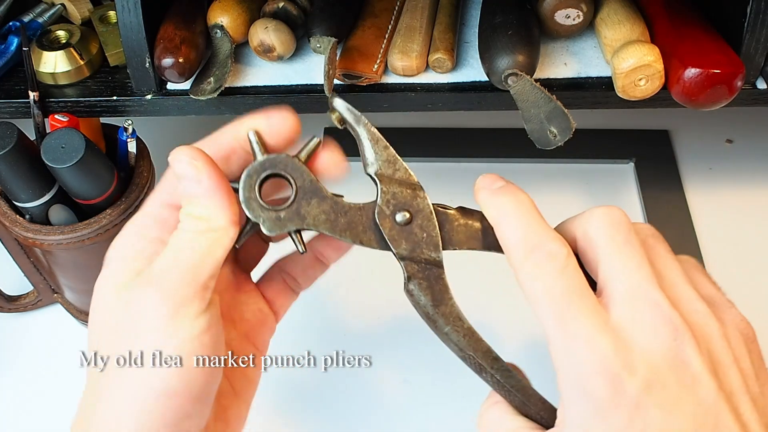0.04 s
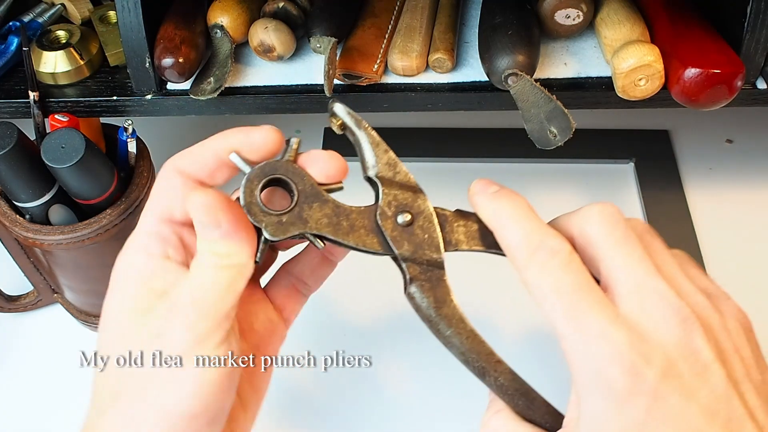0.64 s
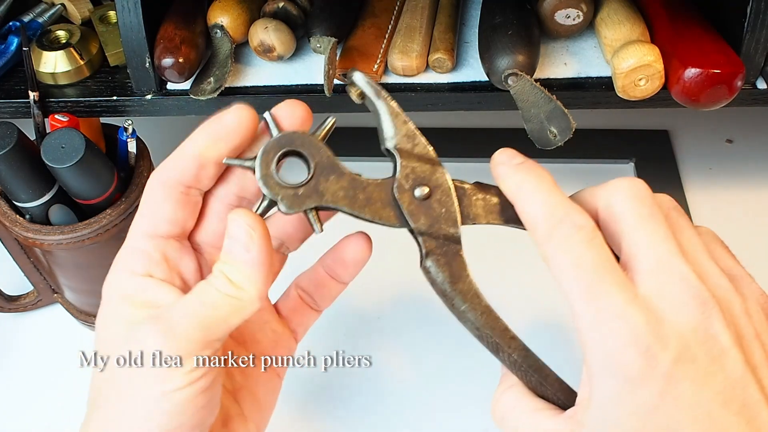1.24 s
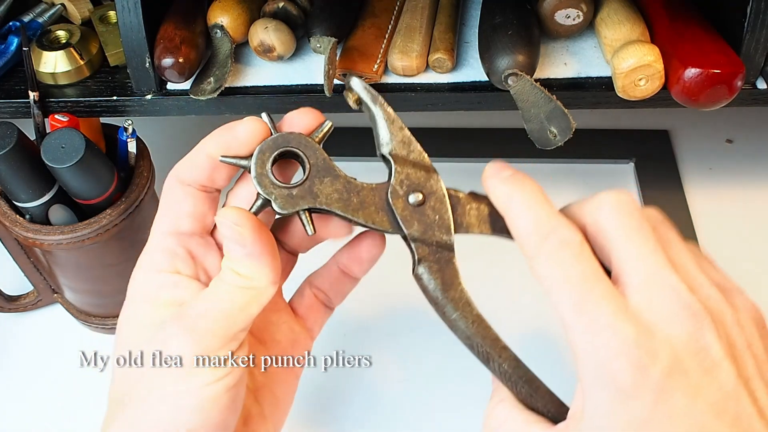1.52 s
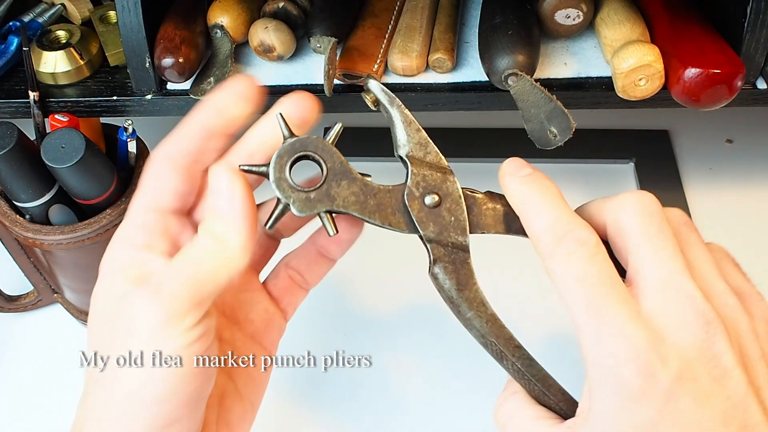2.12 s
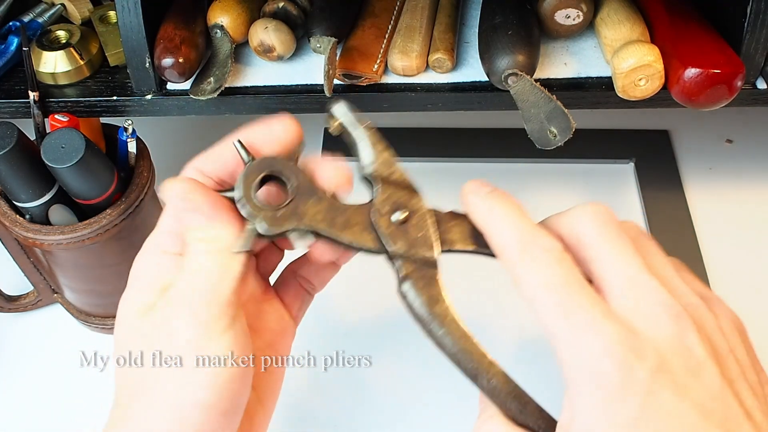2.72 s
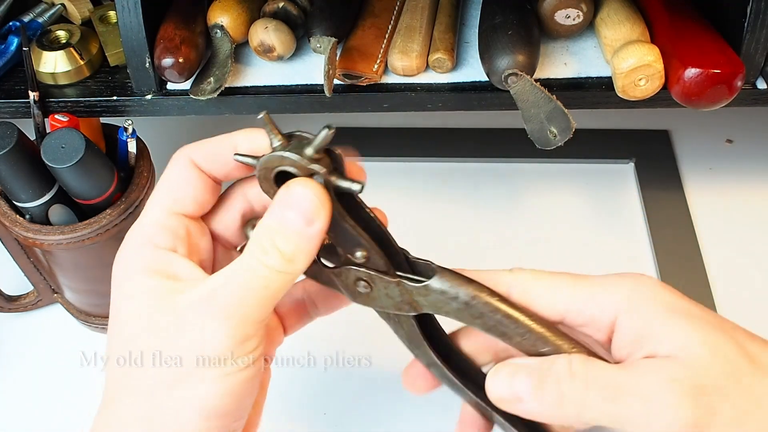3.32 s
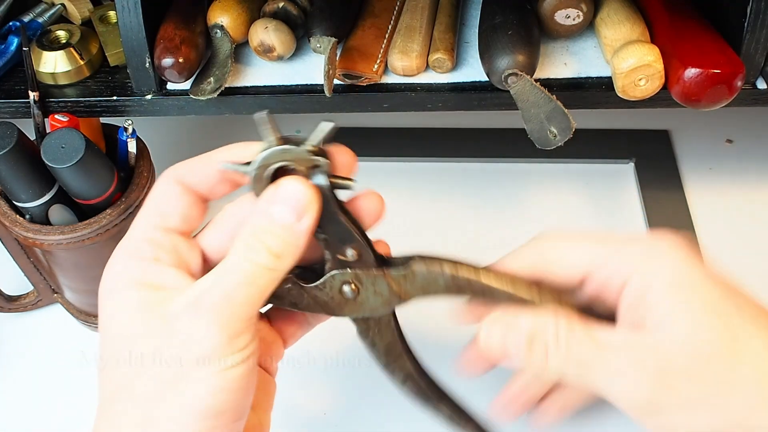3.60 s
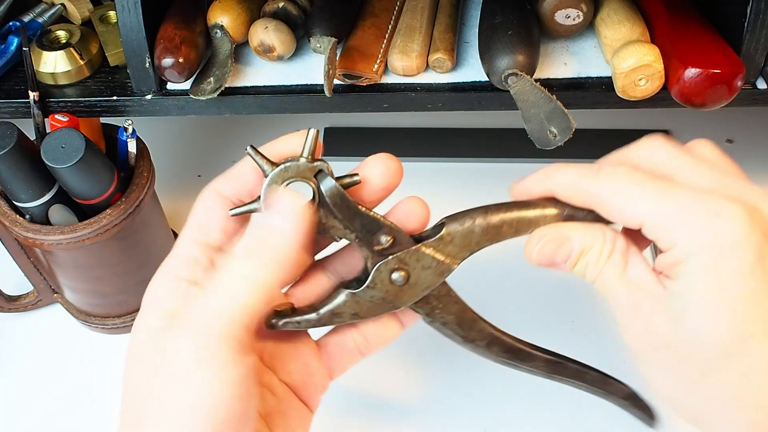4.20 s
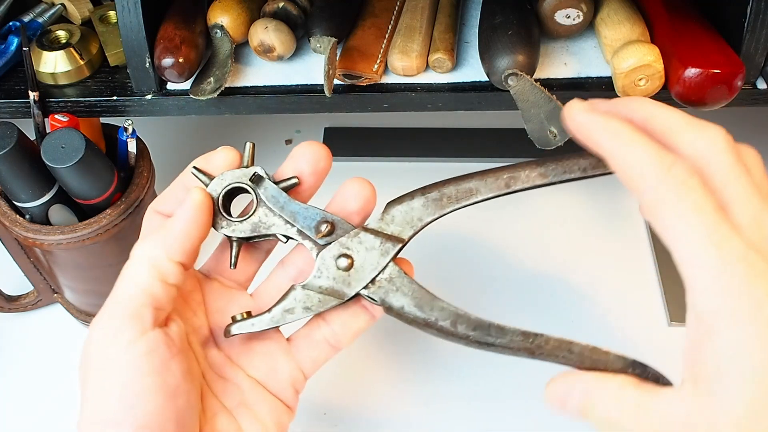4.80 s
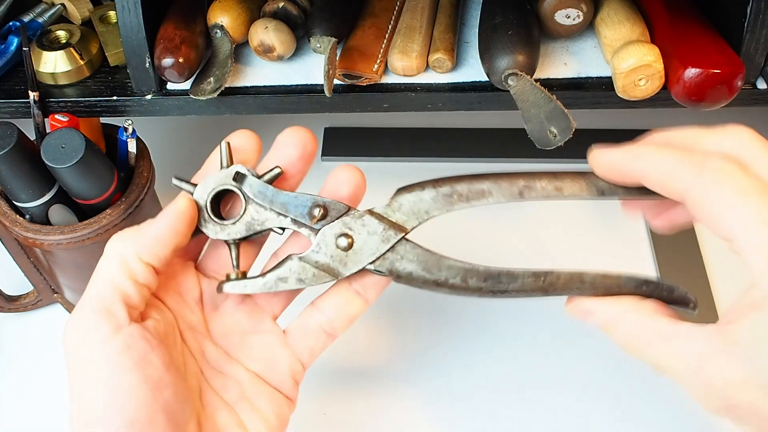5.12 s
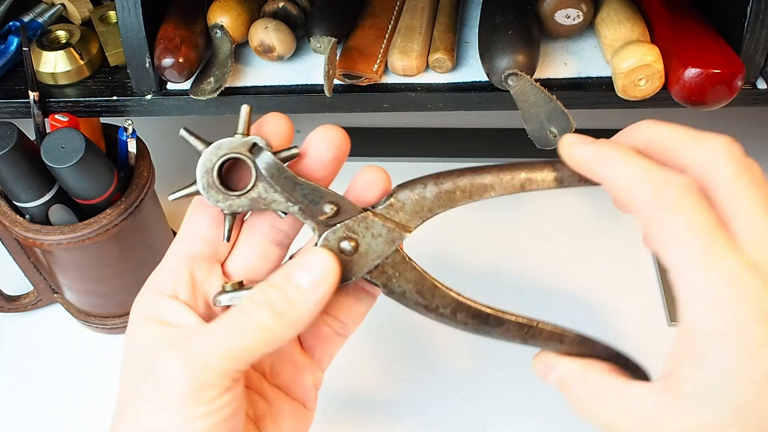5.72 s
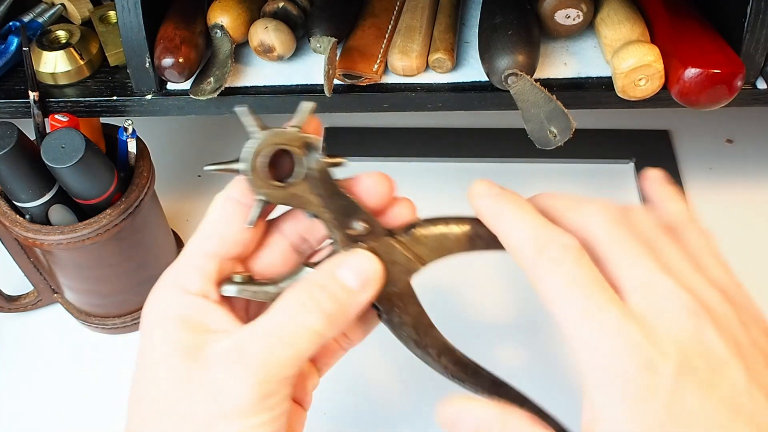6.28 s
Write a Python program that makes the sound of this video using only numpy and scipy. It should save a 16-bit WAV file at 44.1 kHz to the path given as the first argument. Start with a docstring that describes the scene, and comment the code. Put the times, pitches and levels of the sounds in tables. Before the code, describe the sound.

Steel punch pliers scrape and click sharply three times, then rub faintly and clack shut over a soft fan hum.

```python
"""A soft fan hums, then old steel punch pliers scrape and snap close by in a small workroom.
Three times the turret drags off its leaf spring and snaps into the next notch. Fingers shift their grip,
the pivot rubs as the handles open, the bench is bumped, and a punch clacks onto the anvil.
Clicks are short steel modes plus a noise crack; rubs are uneven noise through one resonance.
The loudest clicks clip."""
import sys
import numpy as np
from scipy import signal
from scipy.fft import rfft, irfft, next_fast_len
from scipy.io import wavfile
from scipy.ndimage import uniform_filter1d

SR = 44100
rng = np.random.default_rng(int(sys.argv[2]) if len(sys.argv) > 2 else 0)


def unload_wav(signal):
    """Save mono or channel-first audio to the path in sys.argv[1] as 16-bit WAV at rate SR, clipped to [-1, 1]."""
    wavfile.write(
        sys.argv[1],
        SR,
        np.round(np.clip(np.atleast_2d(signal).T, -1, 1) * 32767).astype(np.int16),
    )


N = 280021
TIME = np.arange(N) / SR


def amp(db):
    """Decibels to gain."""
    return 10 ** (np.asarray(db) / 20)


def unit(x):
    """Scale to rms 1."""
    return x / np.sqrt(np.mean(x ** 2))


def read(points, hz):
    """Interpolate (Hz, value) points on a log-frequency axis."""
    f, value = np.transpose(points)
    return np.interp(np.log(hz + 1), np.log(f), value)


def shape(x, gain):
    """Filter by a gain that is a function of frequency."""
    size = next_fast_len(x.shape[-1])
    return irfft(rfft(x, size) * gain(np.fft.rfftfreq(size, 1 / SR)), size)[..., :x.shape[-1]]


def colour(x, points):
    """Filter by a (Hz, dB) curve, then scale to rms 1."""
    return unit(shape(x, lambda hz: amp(read(points, hz))))


def noise_pair(size, likeness):
    """Stereo noise; likeness is the share of power common to both sides."""
    shared = np.sqrt(likeness) * rng.standard_normal(size)
    return shared + np.sqrt(1 - likeness) * rng.standard_normal((2, size))


def fade(t, t60):
    """Free decay, 60 dB in t60 seconds."""
    return np.exp(-np.log(1000) * t / t60)


def add(track, start_s, sound):
    """Mix a sound into a stereo track."""
    start = max(int(start_s * SR), 0)
    part = sound[..., :N - start]
    track[:, start:start + part.shape[-1]] += part


# Each row: frequency in Hz, relative noise density in dB.
AIR_COLOUR = [(25, -12), (85, .3), (230, -3), (350, -9), (540, -6), (700, -9.5), (1030, -8), (1350, -12.5),
              (2400, -16.5), (2850, -15), (5300, -17.5), (8300, -22), (12000, -26), (15500, -27)]
# Each row: frequency in Hz, share of power common to left and right.
AIR_SHARED = [(60, 0.31), (300, 0.21), (900, .45), (2400, 0.15), (15000, 0.02)]
# Each row: frequency in Hz, rms level in dB.
FAN_LINES = [(533, -76.5), (800.4, -65.5), (999, -74.5), (1049, -75.5)]


def fan(noise_db=-52.5, waver_hz=1.2):
    """Steady fan rush and microphone hiss, with a few slightly wavering tones."""
    shared = shape(rng.standard_normal(N), lambda hz: np.sqrt(read(AIR_SHARED, hz)))
    sides = shape(rng.standard_normal((2, N)), lambda hz: np.sqrt(1 - read(AIR_SHARED, hz)))
    out = amp(noise_db) * colour(shared + sides, AIR_COLOUR)
    for hz, db in FAN_LINES:
        drift = unit(uniform_filter1d(rng.standard_normal(N), size=6000))
        phase = 2 * np.pi * np.cumsum(hz + waver_hz * drift) / SR
        out += amp(db) * np.sqrt(2) * np.sin(phase)
    return out


# Each row: frequency in Hz, t60 in seconds.
ECHO_DECAY = [(300, 0.1), (2800, 0.38), (5500, 0.39), (8500, 0.33), (12500, 0.29), (16000, 0.21)]
# Each row: frequency in Hz, gain in dB.
ECHO_COLOUR = [(200, -6.5), (1500, -3), (3000, 1.5), (5500, -.5), (8500, 1), (12500, 3.5), (16000, -1)]


def echo(x, room_db, build_s=.009):
    """Diffuse workroom echo: builds quickly, lasts longest around 3-6 kHz."""
    t = TIME[:SR // 2]
    noise, tail = noise_pair(len(t), likeness=.15), 0
    centres_hz, t60s = np.transpose(ECHO_DECAY)
    for t60, weights in zip(t60s, np.eye(len(t60s))):
        band = list(zip(centres_hz, weights))
        tail += shape(noise, lambda hz: read(band, hz)) * fade(t, t60)
    onset = 1 - np.exp(-(t / build_s) ** 2)
    response = colour(tail * onset, ECHO_COLOUR) / np.sqrt(len(t))
    return amp(room_db) * signal.fftconvolve(x, response, axes=1)


def with_room(ring, noise, room_db, ring_spread_db=-6, pan_db=0):
    """Direct sound plus echo; the ring fills the room less than the noise. Positive pan is left."""
    out = echo(noise + amp(ring_spread_db) * ring, room_db)
    out[:, :ring.shape[1]] += (ring + noise) * amp([[pan_db / 2], [-pan_db / 2]])
    return out


# Each row: start in seconds, level in dB, mode in Hz, t60 in seconds.
BENCH_BUMPS = [(2.875, -41.5, 137, 0.24), (5.028, -36.5, 129, 0.11), (5.058, -37, 146, 0.091)]


def bench_bumps(rise_s=.0017):
    """A soft push rings only the lowest mode of the bench."""
    out, t = np.zeros((2, N)), TIME[:SR // 3]
    onset = 1 - np.exp(-t / rise_s)
    for start_s, level_db, hz, t60 in BENCH_BUMPS:
        add(out, start_s, amp(level_db) * np.sin(2 * np.pi * hz * t) * fade(t, t60) * onset)
    return out


def friction(strokes, surface, grain_db, ring_width_hz, room_db, pressure_db):
    """Each stroke swells and fades under uneven pressure; its tiny slips excite one resonance."""
    out = np.zeros((2, N))
    for middle_s, half_s, level_db, ring_hz, ring_db in strokes:
        size = int(2 * half_s * SR)
        grain = np.repeat(rng.standard_normal(size), repeats=32)[:size]
        pressure = unit(uniform_filter1d(rng.standard_normal(size), size=300))
        slips = noise_pair(size, likeness=.45) * amp(grain_db * grain + pressure_db * pressure)
        resonance = shape(slips, lambda hz: 1 / (1 + 2j * (hz - ring_hz) / ring_width_hz) ** 2)
        ring = amp(ring_db) * unit(resonance)
        swell = amp(level_db) * np.hanning(size)
        add(out, middle_s - half_s, with_room(swell * ring, swell * colour(slips, surface), room_db))
    return out


# Each row: middle in seconds, half-length in seconds, level in dB.
PIVOT_SQUEAKS = [(3.66, .12, -60), (3.86, .1, -68), (4.56, .1, -61)]
# Rubbed steel, for pivot and fingers. Each row: frequency in Hz, gain in dB.
STEEL_COLOUR = [(800, -12), (2000, -4), (3500, 0.5), (5500, 5), (8000, 1), (10000, -2.5), (13000, 0),
                (16000, -4.5)]


def pivot(ring_hz=8540, ring_db=1):
    """The dry rivet sticks and slips with one thin, high ring."""
    strokes = [(*squeak, ring_hz, ring_db) for squeak in PIVOT_SQUEAKS]
    return friction(strokes, STEEL_COLOUR, grain_db=3.5, ring_width_hz=400, room_db=-9, pressure_db=2.2)


# Each row: middle in seconds, half-length in seconds, level in dB, ring in Hz.
FINGER_RUBS = [(3.13, 0.095, -53.5, 5180), (3.31, 0.073, -57, 5180), (3.45, 0.074, -51, 4400),
               (3.55, .07, -52, 4450), (3.66, .1, -54, 4450), (4.27, .08, -59.5, 9070),
               (4.53, .05, -55, 8540), (5.477, .022, -56.5, 11500), (5.64, .10, -59.5, 4400),
               (6.27, 0.059, -58.5, 4400)]
# One long, faint rub as the pliers are turned over; same columns.
TURNING_RUB = (3.9, .6, -64, 4650)


def fingers(ring_db=-10):
    """Fingers slide on the steel as the grip changes."""
    strokes = [(*rub, ring_db) for rub in FINGER_RUBS + [TURNING_RUB]]
    return friction(strokes, STEEL_COLOUR, grain_db=3.5, ring_width_hz=450, room_db=-7, pressure_db=1.3)


# Each row: middle in seconds, level in dB, ring in Hz.
PALM_BRUSHES = [(3.220, -48.5, 483), (3.252, -44.5, 278)]
# Each row: frequency in Hz, gain in dB.
PALM_COLOUR = [(100, 0), (400, -4), (1200, 0.5), (2700, -1), (4500, -5.5), (5600, -2.5), (9000, -15),
               (16000, -21)]


def palm(half_s=.033, ring_db=-7):
    """The palm brushes a handle, duller than the fingers."""
    strokes = [(middle_s, half_s, db, hz, ring_db) for middle_s, db, hz in PALM_BRUSHES]
    return friction(strokes, PALM_COLOUR, grain_db=2.5, ring_width_hz=350, room_db=-8, pressure_db=1.5)


# Each row: middle in seconds, level in dB, ring in Hz.
TURRET_DRAGS = [(0.598, -42.5, 4350), (1.150, -59, 5100), (1.386, -54, 5100), (1.661, -40, 5150),
                (2.480, -60, 5300), (2.706, -41, 5600)]
# Each row: frequency in Hz, gain in dB.
DRAG_COLOUR = [(500, -20.5), (1800, -12), (3400, 0.5), (4200, -1.5), (5700, 0), (7200, -2), (8800, 0.5),
               (11000, -4), (12700, -3), (16000, -12)]


def turret_scrapes(half_s=.021, hard_drag_db=-41, hard_ring_db=-9, ring_per_db=.42):
    """The turret drags on its spring, hardest just before a snap; light drags ring, hard ones grate."""
    strokes = [(middle_s, half_s, db, hz, hard_ring_db + ring_per_db * (hard_drag_db - db))
               for middle_s, db, hz in TURRET_DRAGS]
    return friction(strokes, DRAG_COLOUR, grain_db=3, ring_width_hz=700, room_db=-10.5, pressure_db=.6)


def burst(spectrum, level_db, t60, likeness):
    """Coloured stereo noise that starts at once and dies away."""
    t = TIME[:SR // 8]
    return amp(level_db) * colour(noise_pair(len(t), likeness), spectrum) * fade(t, t60)


def strike(modes, crack_colour, crack_db, crack_t60, scatter, rise_s):
    """Steel on steel, damped by the hand: short ringing modes and a crack of countless finer ones."""
    t = TIME[:SR // 8]
    hz, db, t60 = np.transpose(modes)[:, :, None]
    # A clean blow starts the modes in step; a rattling one scatters them.
    phase = scatter * rng.uniform(-np.pi, np.pi, hz.shape)
    # High modes reach left and right less alike.
    skew_rad = .898 * (hz / 10000) ** 2 * rng.standard_normal(hz.shape)
    stereo_phase = np.array([phase + skew_rad, phase - skew_rad])
    ring = np.sum(amp(db) * fade(t, t60) * np.sin(2 * np.pi * hz * t + stereo_phase), axis=1)
    crack = burst(crack_colour, crack_db, crack_t60, likeness=.2)
    return np.array([ring, crack]) * (1 - np.exp(-t / rise_s))


# Each row: start in seconds, level in dB, ring in Hz.
LOOSE_TICKS = [(2.1057, -25, 5050), (3.5442, -32, 3170), (3.5480, -35.5, 4470)]
# Each row: frequency in Hz, gain in dB.
LOOSE_COLOUR = [(300, -15), (2000, -18), (3500, -8), (5000, 3), (6200, -3.5), (9000, -11.5), (10500, -16),
                (14000, -16), (16000, -25)]


def loose_parts(ring_db=-3, ring_t60_s=.028):
    """Loose parts touch lightly; each tick is one mode and a crack."""
    out = np.zeros((2, N))
    for start_s, level_db, hz in LOOSE_TICKS:
        modes = [(hz, ring_db, ring_t60_s)]
        ring, crack = strike(modes, LOOSE_COLOUR, crack_db=-3, crack_t60=.02, scatter=0, rise_s=.00053)
        add(out, start_s, amp(level_db) * with_room(ring, crack, room_db=-13.5))
    return out


# Closed jaws. Each row: mode in Hz, level in dB, t60 in seconds.
JAW_MODES = [(960, -37.5, 0.05), (2107, -35, 0.09), (2821, -32.5, 0.031), (3610, -22.5, 0.015),
             (4025, -4.5, 0.017), (4380, -5.5, 0.015), (4700, -18, .012), (5060, -19, 0.03),
             (5320, -17.5, 0.028), (5830, -15, 0.019), (7500, -23.5, 0.017), (8040, -29.5, .03),
             (8800, -28, 0.026), (12390, -40, .03)]
# Each row: frequency in Hz, gain in dB.
JAW_CRACK = [(200, -27), (1500, -27), (2500, -9), (3400, -13), (4100, 0.5), (5900, 1.5), (7500, -10),
             (10000, -21), (14000, -23), (16000, -29)]


def punch_clack(start_s=5.1639, level_db=.3):
    """The punch lands on the anvil with one sharp impact that rings the jaws."""
    out = np.zeros((2, N))
    ring, crack = strike(JAW_MODES, JAW_CRACK, crack_db=-16, crack_t60=.027, scatter=.15, rise_s=.0003)
    impact = burst(JAW_CRACK, level_db=-6, t60=.005, likeness=.6)
    clack = with_room(ring, crack + impact, room_db=-11, ring_spread_db=-13, pan_db=1.6)
    add(out, start_s, amp(level_db) * clack)
    return out


# Each row: start in seconds, level in dB, impact in dB, then gains in dB at 3, 6 and 12.5 kHz.
NOTCH_SNAPS = [(0.8, -.3, -7, 3, -2.5, -.5), (1.7906, -.2, -1.5, -1.5, 5, -4),
               (2.7838, -1.3, 0, -12, 2, 3.5)]
# Turret and spring. Each row: mode in Hz, level in dB, t60 in seconds.
TURRET_MODES = [(910, -30, 0.037), (2834, -23.5, .022), (3300, -29, .02), (4340, -21.5, 0.027),
                (4774, -19, 0.02), (5000, -16, .024), (5450, -13.5, 0.025), (5752, -10.5, 0.022),
                (6070, -12.5, 0.015), (6220, -12.5, .02), (7110, -20.5, 0.023), (7470, -22.5, 0.018),
                (8650, -20, 0.0221), (9350, -21, 0.025), (11240, -24.5, .018), (12100, -18.5, .022),
                (12320, -13, 0.023), (13100, -14.5, .022), (14060, -18, 0.018), (14210, -20, .018),
                (15570, -21, .022)]
# Spring chatter and low thud. Each row: frequency in Hz, gain in dB.
CHATTER_COLOUR = [(300, -29.5), (750, -13), (1400, -11.5), (2200, -13), (2900, -5.5), (3700, -6.5),
                  (5700, 1.5), (7500, -1), (9800, -4.5), (12600, 1.5), (14500, 1.5), (16000, -3.5)]
THUD_COLOUR = [(100, -32), (300, -19), (700, -3), (1300, 1), (2000, -2), (2800, -18), (6000, -35.5)]


def turret_snaps(thud_db=-19, thud_per_db=.55):
    """The spring drops into a notch, then chatters as the turret rings; each notch has its colour."""
    out = np.zeros((2, N))
    hz, db, t60 = np.transpose(TURRET_MODES)
    for start_s, level_db, impact_db, low_db, mid_db, treble_db in NOTCH_SNAPS:
        notch = [(1500, 0), (3000, low_db), (4500, 0), (6000, mid_db), (8500, 0),
                 (12500, treble_db), (16000, 1.5 * treble_db)]
        modes = np.transpose([hz, db + read(notch, hz), t60])
        spectrum = [(f, gain_db + read(notch, f)) for f, gain_db in CHATTER_COLOUR]
        ring, chatter = strike(modes, spectrum, crack_db=-8.5, crack_t60=.032, scatter=.98, rise_s=.00016)
        impact = burst(spectrum, impact_db, t60=.007, likeness=.35)
        # A short, dull low thud under each snap, strongest where the snap has least treble.
        thud_level_db = impact_db + thud_db - thud_per_db * treble_db
        thud = burst(THUD_COLOUR, thud_level_db, t60=.007, likeness=.6)
        snap = with_room(ring, chatter + impact + thud, room_db=-10.5, pan_db=1.5)
        add(out, start_s, amp(level_db) * snap)
    return out


def scene():
    """Clicks, friction and bumps over the fan."""
    clicks = turret_snaps() + punch_clack() + loose_parts()
    rubs = turret_scrapes() + fingers() + palm() + pivot()
    return fan() + bench_bumps() + rubs + clicks


# Each row: centre in Hz, half-width in Hz, gain in dB.
HOUSING_DIPS = [(1605, 112, -4.5), (2260, 130, -3), (6550, 154, -12.5), (10400, 250, -13.5)]


def record(dry, ceiling=.93, top_hz=16100, dc_offset=-.00275):
    """The microphone housing cuts narrow dips; the converter clips, cuts the top and sits off zero."""
    def housing(hz):
        return amp(sum(db / (1 + ((hz - f) / width) ** 2) for f, width, db in HOUSING_DIPS))

    clipped = np.clip(shape(dry, housing), -ceiling, ceiling)
    lowpass = signal.ellip(10, .2, 70, top_hz, fs=SR, output="sos")
    return signal.sosfilt(lowpass, clipped) + dc_offset


dry = scene()
out = record(dry)
unload_wav(out)
```